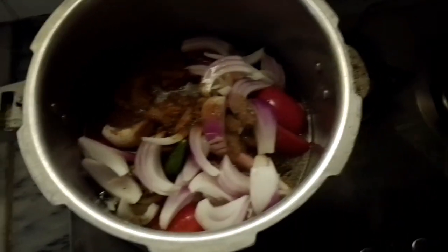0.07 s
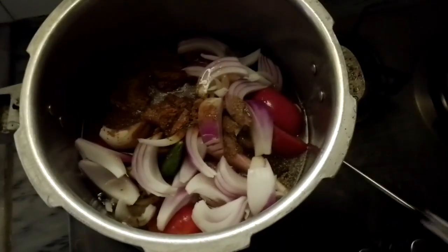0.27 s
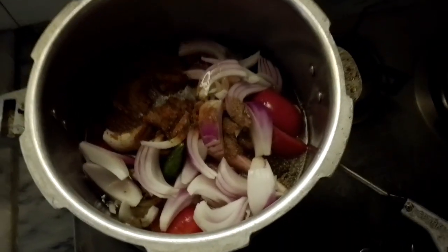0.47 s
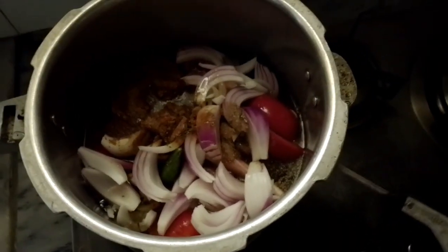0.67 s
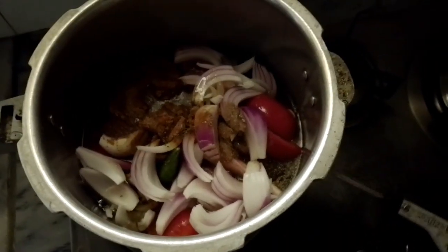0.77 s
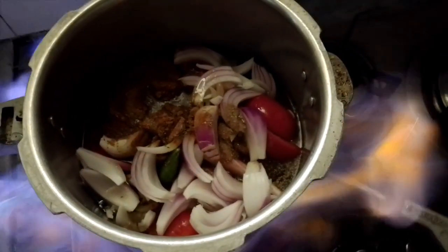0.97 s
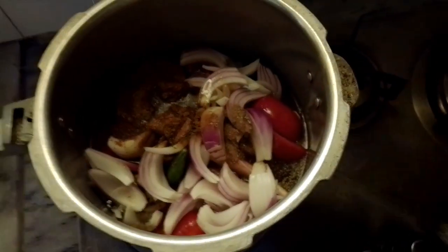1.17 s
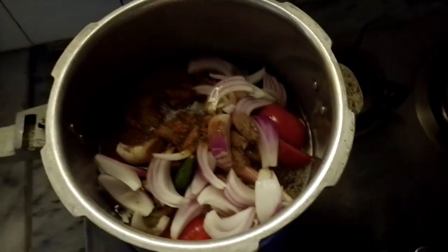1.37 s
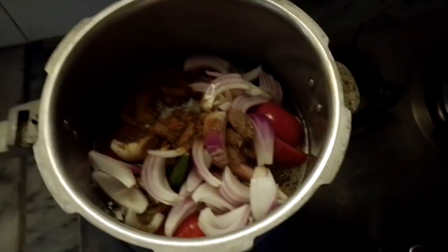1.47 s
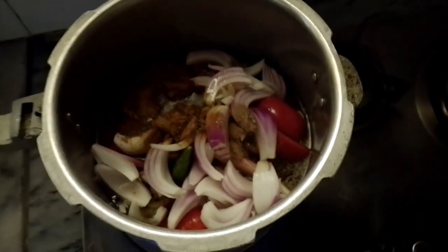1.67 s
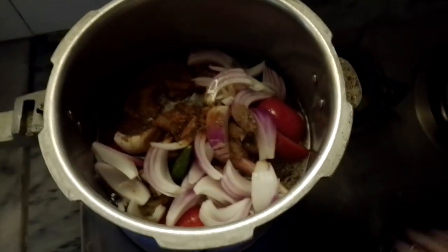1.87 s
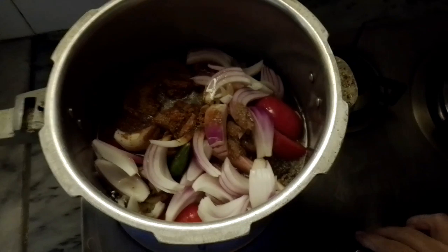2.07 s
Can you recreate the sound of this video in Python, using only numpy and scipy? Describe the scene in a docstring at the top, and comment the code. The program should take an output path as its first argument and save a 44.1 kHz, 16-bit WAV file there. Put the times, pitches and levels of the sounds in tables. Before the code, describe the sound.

A steel spark lighter clicks over quiet gas hiss: a faint tick at 0.4 s, a hard snap at 0.54 with bright spring buzz, release at 0.74, second snap at 0.92, release at 1.09. Gas catches with a soft low whoomp around 1.0-1.1, then flutters faintly. From 1.55 the lighter ticks, slides and scrapes, landing at 1.87 with a loud fading rattle. Close microphone overloads; background ducks around snaps.

```python
"""In a kitchen, gas hisses from a burner. A steel spark lighter is pressed and let go twice.
Its snaps are short decaying noises; its spring buzzes in the tube as crowds of tiny random collisions.
The second spark lights the gas: a soft whoomp of low noise, then a fluttering flame. The lighter is laid
down, scraping and rattling on the worktop. The microphone overloads on the snaps, and a look-ahead
limiter ducks everything around them."""
import sys
import numpy as np
from scipy import signal
from scipy.fft import rfft, irfft, next_fast_len
from scipy.io import wavfile
from scipy.ndimage import uniform_filter1d, minimum_filter1d

SR = 44100
rng = np.random.default_rng(int(sys.argv[2]) if len(sys.argv) > 2 else 0)


def dump_mix(stems):
    """Bounce the given channels to the path in sys.argv[1] as a 16-bit WAV at rate SR."""
    frames = np.atleast_2d(stems).T  # one column per channel
    limited = np.clip(frames, -1, 1)  # hard clip at full scale
    pcm = np.round(limited * 32767).astype(np.int16)
    wavfile.write(sys.argv[1], SR, pcm)


N = 93403
T = np.arange(N) / SR  # time in seconds

# Snaps of the lighter and its knocks when laid down:
# start_s, ring_db, decay_ms, brightness_db_per_octave, knock_db, knock_hz, thump_db
SNAPS = [(0.418, -26, 3.4, 6, -69, 1500, -54), (0.5371, -2, 1.4, -6, -9.5, 1730, -42),
         (0.5399, 10, 1.78, 5, -6, 1296, -40), (0.7438, 3.5, 1.32, -1.5, -7, 1870, -17),
         (0.7465, 3.5, 1.9, 0, -45, 1700, -47), (0.8625, -5, 2.4, -1, -24, 600, -59),
         (0.875, -26, 5.9, -3, -32, 2480, -55), (0.9241, 12, 3.3, 2, -4.5, 1600, -14.5),
         (1.0910, 3.5, 2.1, 0.5, -10.5, 2130, -12.5), (1.5513, -2.5, 1.5, 16.5, -17.5, 3570, -45),
         (1.5724, -4, 0.82, 17.5, -30, 3530, -69), (1.595, -20, 3.7, 14, -34, 3500, -69),
         (1.761, -8, 9, 0, -12.5, 2260, -56), (1.7688, 5, 1.34, 0.5, -3.5, 1110, -31),
         (1.8184, -5, 0.99, -1, -19, 1300, -28), (1.8677, 12, 1.5, -4, -2, 2380, -9.5),
         (1.9197, -3, 1.4, 0, -32, 2600, -50), (1.95, -4.5, 1.8, -2, -36, 2600, -53),
         (1.97, -3.5, 1.9, 0.5, -36, 2600, -50)]
# Colour of the steel ring, the hollow knock and the low thump in each snap: pitch_hz, level_db
SNAP_COLOUR = [(500, -34.5), (2500, -21), (5000, -10.5), (7000, -7), (8800, 4.5), (10500, -2.5),
               (15400, -2)]
KNOCK_COLOUR = [(150, -31), (300, -14), (550, -4.5), (900, -7), (1150, 0), (1400, -8), (1750, -4.5),
                (2500, -3.5), (4000, -4.5), (9000, -7)]
THUMP_COLOUR = [(25, 1), (110, -3.5), (260, -10), (1000, -25), (4000, -44)]
KNOCK_WIDTH_HZ, KNOCK_LIFT_DB = 330, 9

# The plunger hitting its stop and bouncing: start_s, level_db
STOPS = [(0.8637, 1), (0.879, -15)]
# The lighter's case ringing as the plunger springs back: pitch_hz, level_db, decay_ms
CASE_MODES = [(1840, -39, 3.5), (2390, -26, 4.5), (2550, -21, 4), (3240, -32, 4.2), (4270, -25.5, 7.4),
              (5000, -24, 3.7), (14570, -22, 3), (14800, -12, 3)]

# Resonances of the steel tube, then the extra ones with the plunger out: pitch_hz, width_hz, lift_db
TUBE = [(2500, 310, 2), (4150, 900, 3.5), (6470, 140, 4.5), (7160, 390, 5.5), (8430, 550, 3),
        (11800, 400, -5.5), (12700, 200, 2)]
OPEN_TUBE = [(4380, 180, -0.5), (7400, 260, 7.5), (11570, 400, 8.5)]

# Buzzing and scraping, all with the same columns:
# start_s, end_s, level_db, hold_s, fall_db_per_s, brightness_db_per_octave, top_fall_db_per_s
# Spring buzzing with the plunger held in
PRESSED = [(0.538, 0.744, -7.5, 0.084, 108, -0.5, 43), (0.924, 1.091, -9.5, 0.098, 69, -0.5, 40)]
# Looser, quieter buzz with the plunger out
RELEASED = [(0.745, 0.878, -20.5, 0.12, 15, 2.5, 40), (0.878, 0.924, -37, 0.02, 60, -5.5, 60),
            (1.091, 1.5, -22, 0.074, 122, 0.5, 50), (1.77, 1.824, -18.5, 0.035, 30, 1.5, 90)]
# Buzz with the tube lying on the worktop
LYING = [(1.868, 2.2, -10.5, 0.11, 113, 0, 50)]
# Tip sliding lightly over the worktop
SLIDES = [(1.552, 1.73, -27, 0.077, 71.5, 0, 60)]
# Handle scraping on the worktop
SCRAPES = [(1.789, 1.823, -17, 0.03, 20, -0.43, 50), (1.823, 1.9, -19, 0.012, 120, 0.11, 50)]
# Colours of those five sounds: pitch_hz, level_db
PRESSED_COLOUR = [(240, -108), (400, -80), (623, -27.5), (1150, -36), (1530, -40), (2280, -36), (2830, -22),
                  (3950, -26), (4200, -22.5), (6450, -11), (7180, -13), (9020, -1.5), (10500, -6),
                  (14100, -4), (15400, -4.5)]
RELEASED_COLOUR = [(450, -30), (600, -28), (900, -30), (1550, -41), (2500, -22), (3250, -23.5),
                   (3900, -29.5), (4300, -11), (5700, -15.5), (6500, -8.5), (7900, -9), (8400, 1.5),
                   (9400, 1.5), (10200, -8.5), (11500, -8), (12500, -11), (15400, -12)]
LYING_COLOUR = [(800, -27), (2000, -23.5), (3300, -19.5), (4100, -16.5), (5200, -6), (5900, -10.5),
                (7400, -7.5), (8600, 0.5), (9300, 5), (10400, -5), (12000, -9), (15400, -16)]
SLIDE_COLOUR = [(200, -35), (400, -6.5), (1050, -3.5), (1350, -25), (1700, -4), (2300, -9.5), (3500, -14),
                (4400, -11.5), (5000, -19), (6500, -13), (8000, -7.5), (8700, 3.5), (9800, -2), (11500, -6),
                (12400, 0), (12950, 0), (13600, -5), (15400, -10)]
SCRAPE_COLOUR = [(150, -19), (250, -1.5), (420, 5), (700, 0.5), (1300, -2), (2200, -3.5), (3600, -8),
                 (6000, -6), (7700, -6), (8500, 3.5), (9800, 2.5), (11200, -13), (15400, -15)]

# Average collisions per second, and how unevenly strong they are
RATTLE_PER_S, RATTLE_SCATTER_DB = 5000, -1
LYING_PER_S, LYING_SCATTER_DB = 6000, 2.5
SCRAPE_PER_S, SCRAPE_SCATTER_DB = 5000, 2
RATTLE_SWAY_DB = 1.13  # spread of the slow swaying in strength
RING_T60_S, RING_DB = 0.041, -2  # dense fine modes: time to fall 60 dB, level against the bare hits
SIZZLE_HZ, SIZZLE_DB = 10200, 1.5  # the top above this starts lifted, then dies first

# Worktop sounding under the rattling lighter: time_s, level_db
WORKTOP = [(1.86, -62), (1.9, -38.5), (1.96, -29), (2.03, -36), (2.12, -30)]
# Colour of that rumble: pitch_hz, level_db
WORKTOP_COLOUR = [(60, -45), (170, -34), (260, 0.5), (420, -1), (650, -1), (1100, -6.5), (1700, -21),
                  (4000, -29), (9000, -54)]
# Dull bumps on the worktop: start_s, level_db, decay_ms
BUMPS = [(2.079, -29, 3), (2.1095, -25.5, 10)]
# Low ring of the worktop: time_s, level_db
WORKTOP_RING = [(1.93, -72), (1.99, -39), (2.045, -30.5), (2.09, -35), (2.12, -73)]
WORKTOP_RING_HZ = 605  # centre of a slightly wandering pitch

# Colours of the gas jet and the flame: pitch_hz, level_db
GAS_COLOUR = [(30, -19), (60, -26), (105, -21), (165, -34), (230, -14.5), (320, -12.5), (420, -1.5),
              (520, -8.5), (800, -12), (1200, -18), (2000, -27.5), (3200, -23), (4200, -24), (5300, -20),
              (7000, -16.5), (8000, -18), (9300, -9), (10800, -18.5), (15400, -17)]
FLAME_COLOUR = [(30, -30), (130, -20), (200, -10.5), (320, -2), (460, -3), (600, -11), (800, -11.5),
                (1500, -23), (3000, -34), (8000, -30)]
# Resonances of the burner: pitch_hz, width_hz, lift_db
BURNER = [(441, 9.5, 5), (575, 4.3, 19.5), (10100, 290, 2.5)]
# The flame catching, then settling: time_s, level_db
FLAME = [(0.95, -76), (0.995, -36.5), (1.035, -30), (1.085, -22.5), (1.115, -46), (1.23, -37), (1.32, -49),
         (1.43, -45.5), (1.52, -43), (1.6, -49.5), (2.12, -39)]
FLAME_FLUTTER_DB = 2
GAS_DB, GAS_LIT_DB, LIT_S = -42.5, -1, 1.0  # level, change once lit, when that change begins

HUM_HZ, HUM_DB = 61, -73
OVERLOAD_DB = 7.5  # the microphone cannot go past this level
CEILING_DB, AHEAD_S, ATTACK_S, RECOVER_DB_PER_S = -0.5, 0.044, 0.008, 113  # limiter
TOP_HZ = 15450  # highest pitch let through


def undb(db):
    """Turn decibels into a gain."""
    return 10 ** (np.asarray(db) / 20)


def unit(x):
    """Scale a sound to an average (rms) level of 1."""
    return x / np.sqrt(np.mean(x ** 2))


def curve(points):
    """Gain along (time_s, level_db) points, practically silent before the first."""
    time_s, level_db = np.array(points).T
    return undb(np.interp(T, time_s, level_db, left=-120))


def walk(rate):
    """Smooth random wander with a spread of 1, drawing about `rate` new values a second."""
    step = max(int(SR / rate), 2)
    stairs = rng.standard_normal(N)[np.arange(N) // step]
    return unit(uniform_filter1d(uniform_filter1d(stairs, step), step))


def colour(x, points, bright_db=0, peaks=()):
    """Shape a sound's spectrum through the points, with a tilt and resonances, as an object does; rms 1."""
    size = 2 * next_fast_len(N, real=True)
    f = np.maximum(np.arange(size // 2 + 1) * SR / size, 1)
    hz, db = np.array(points).T
    shape = np.interp(np.log(f), np.log(hz), db)
    shape += bright_db * np.log2(np.clip(f, hz[0], hz[-1]))
    shape += 12 * np.minimum(np.log2(f / hz[0]), 0)  # fall 12 dB per octave below the first point
    shape -= np.clip((f - TOP_HZ) / 50, 0, 40)
    for centre, width, lift in peaks:
        shape += lift / (1 + (2 * (f - centre) / width) ** 2)
    # Keeping half the cepstrum makes the filter respond only after each hit, never before
    cepstrum = irfft(shape * np.log(10) / 20)[:size // 2]
    response = np.exp(2 * rfft(cepstrum, size))
    return unit(irfft(rfft(x, size) * response)[:N])


def noise(points, bright_db=0, peaks=()):
    """Random noise with a given colour, rms 1."""
    return colour(rng.standard_normal(N), points, bright_db, peaks)


def impacts(rate, scatter_db):
    """A dense random train of tiny collisions, each a click of uneven size pushing either way."""
    size = undb(scatter_db * np.minimum(rng.exponential(size=N), 5))
    happens = rng.random(N) < rate / SR
    return happens * size * np.sign(rng.standard_normal(N))


def strike(start, decay_ms):
    """A blow's loudness: instant attack, then exponential decay."""
    age = np.maximum(T - start, 0)
    return (T >= start) * np.exp(-age * 1000 / decay_ms)


def chatter(rows, points, rate, scatter_db, peaks):
    """Bursts of tiny collisions with a fine ring: each holds, fades and dulls, and is stopped at its end."""
    out = 0
    top_filter = signal.butter(2, SIZZLE_HZ, "high", fs=SR, output="sos")
    for start, end, db, hold, fall, bright_db, top_fall in rows:
        hits = impacts(rate, scatter_db) * undb(RATTLE_SWAY_DB * walk(90))
        ring = rng.standard_normal(N) * np.exp(-np.log(1000) * T / RING_T60_S)
        ring = ring / np.linalg.norm(ring)
        hits = hits + undb(RING_DB) * signal.fftconvolve(hits, ring)[:N]
        buzz = colour(hits, points, bright_db, peaks)
        age = np.maximum(T - start, 0)
        top = signal.sosfiltfilt(top_filter, buzz)
        buzz = buzz + (undb(SIZZLE_DB - top_fall * age) - 1) * top
        gate = uniform_filter1d(1. * ((T > start) & (T < end)), size=130)  # soft edges of about 3 ms
        out = out + gate * undb(db - fall * np.maximum(age - hold, 0)) * buzz
    return out


def snaps():
    """Hard blows: a bright steel ring over a short hollow knock and a low thump."""
    out = 0
    for start, db, decay_ms, bright_db, knock_db, knock_hz, thump_db in SNAPS:
        ring = undb(db) * noise(SNAP_COLOUR, bright_db, TUBE)
        knock_peak = [(knock_hz, KNOCK_WIDTH_HZ, KNOCK_LIFT_DB)]
        knock = undb(knock_db) * noise(KNOCK_COLOUR, 0, knock_peak)
        thump = undb(thump_db) * noise(THUMP_COLOUR)
        loudness = uniform_filter1d(strike(start, decay_ms), size=12)  # slightly softened attack
        out = out + loudness * (ring + knock + thump)
    return out


def plunger():
    """The plunger springs back against its stop and rings the case as a set of dying tones."""
    out = 0
    for start, db in STOPS:
        for hz, mode_db, decay_ms in CASE_MODES:
            tone = np.sin(2 * np.pi * hz * (T - start))
            out = out + undb(db + mode_db) * strike(start, decay_ms) * tone
    return out


def spring():
    """The spring knocks rapidly against the tube: plunger in, plunger out, then lying on the worktop."""
    pressed = chatter(PRESSED, PRESSED_COLOUR, RATTLE_PER_S, RATTLE_SCATTER_DB, TUBE)
    released = chatter(RELEASED, RELEASED_COLOUR, RATTLE_PER_S, RATTLE_SCATTER_DB, TUBE + OPEN_TUBE)
    lying = chatter(LYING, LYING_COLOUR, LYING_PER_S, LYING_SCATTER_DB, TUBE)
    return pressed + released + lying


def worktop():
    """The lighter drags over the worktop in tiny collisions; the worktop rumbles, rings and is bumped."""
    slide = chatter(SLIDES, SLIDE_COLOUR, SCRAPE_PER_S, SCRAPE_SCATTER_DB, ())
    scrape = chatter(SCRAPES, SCRAPE_COLOUR, SCRAPE_PER_S, SCRAPE_SCATTER_DB, ())
    push = curve(WORKTOP)
    for start, db, decay_ms in BUMPS:
        push = push + undb(db) * strike(start, decay_ms)
    rumble = push * noise(WORKTOP_COLOUR)
    pitch_hz = WORKTOP_RING_HZ * (1 + 0.0046 * walk(40.14))
    ring = unit(np.sin(2 * np.pi * np.cumsum(pitch_hz) / SR))
    return slide + scrape + rumble + curve(WORKTOP_RING) * ring


def burner():
    """Rushing gas makes a steady resonant hiss; once it has caught, the flame adds low fluttering noise."""
    lit = np.clip((T - LIT_S) / .1, 0, 1)
    gas = noise(GAS_COLOUR, 0, BURNER) * undb(GAS_DB + GAS_LIT_DB * lit)
    flame = noise(FLAME_COLOUR) * curve(FLAME)
    flutter = undb(FLAME_FLUTTER_DB * walk(44.68))
    return gas + flame * flutter


def hum():
    """A faint, steady low hum: one pure tone."""
    return undb(HUM_DB) * unit(np.sin(2 * np.pi * HUM_HZ * T))


def scene():
    """Burner, lighter and worktop over a faint hum."""
    return (burner() + snaps() + plunger() + spring() + worktop() + hum())[None]


def record(dry):
    """The input overloads; a limiter ducks ahead of each peak and recovers after it; the top is cut."""
    x = undb(OVERLOAD_DB) * np.tanh(dry[0] / undb(OVERLOAD_DB))
    over_db = np.maximum(20 * np.log10(np.abs(x) + 1e-9) - CEILING_DB, 0)
    ahead = int(AHEAD_S * SR)
    # Largest excess in the stretch just ahead
    duck_db = -minimum_filter1d(-over_db, ahead, origin=-(ahead // 2))
    # Let the ducking ease off no faster than the recovery rate
    recovery_db = RECOVER_DB_PER_S * T
    duck_db = np.maximum.accumulate(duck_db + recovery_db) - recovery_db
    x = x * undb(-uniform_filter1d(duck_db, int(ATTACK_S * SR)))
    top_cut = signal.ellip(10, .2, 70, TOP_HZ, fs=SR, output="sos")
    return signal.sosfilt(top_cut, x)[None]


dry = scene()
out = record(dry)
dump_mix(out)
```